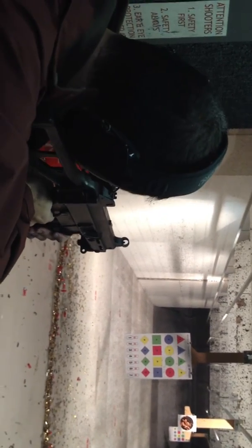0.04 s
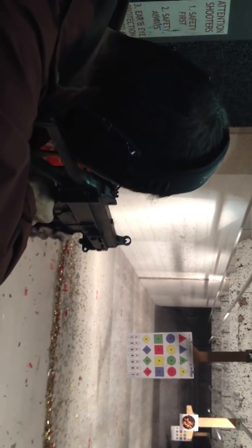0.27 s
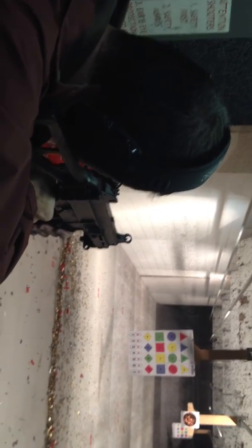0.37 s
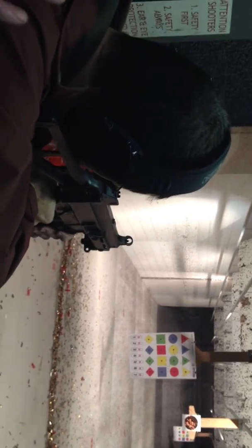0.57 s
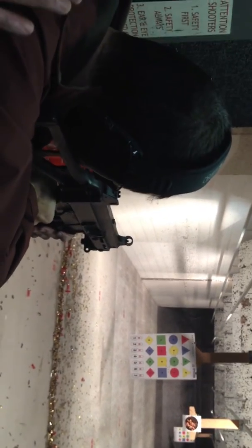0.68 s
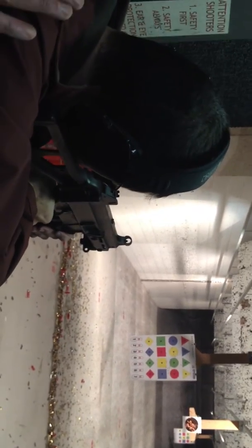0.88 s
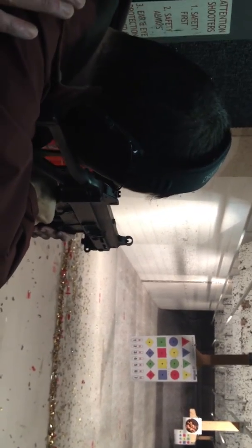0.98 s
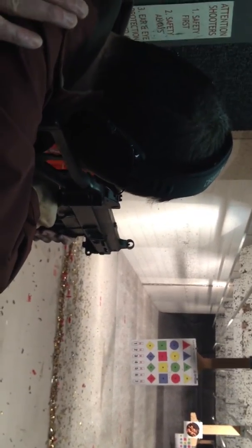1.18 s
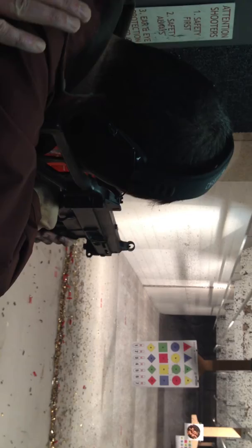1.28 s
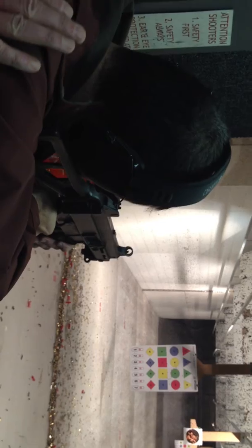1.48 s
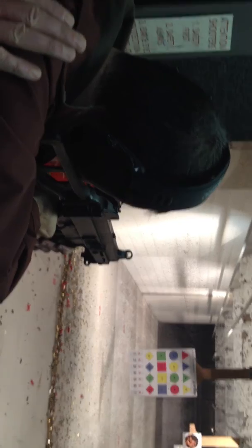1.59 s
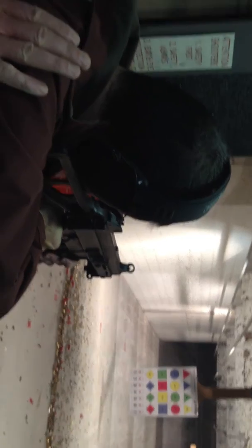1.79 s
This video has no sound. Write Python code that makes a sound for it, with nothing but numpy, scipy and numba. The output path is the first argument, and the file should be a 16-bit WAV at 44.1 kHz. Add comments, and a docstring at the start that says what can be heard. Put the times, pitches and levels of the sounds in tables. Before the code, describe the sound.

Two rapid submachine gun shots blast and echo in a concrete indoor range, then a casing clinks

```python
"""Two gunshots a tenth of a second apart: a submachine gun in a concrete indoor range, close to the microphone.
Each shot is a pressure pulse, a bright noise blast, wall echoes, a boom from down the lane and reverberation.
A spent case then clinks, as struck modes and short noise; ventilation is filtered noise with a duct drone.
The microphone overloads, and its gain control ducks the ventilation, which slowly comes back up."""
import sys
import numpy as np
from scipy import signal
from scipy.fft import rfft, irfft
from scipy.io import wavfile
from scipy.ndimage import uniform_filter1d
from numba import njit

SR = 44100
rng = np.random.default_rng(int(sys.argv[2]) if len(sys.argv) > 2 else 0)


def wav_record(signal):
    """Record a signal, one row per channel, as 16-bit PCM in the file named by sys.argv[1]."""
    frames = np.transpose(np.atleast_2d(signal))
    bounded = np.clip(frames, -1, 1)
    # unit amplitude maps onto the largest positive 16-bit level
    quanta = np.round(bounded * 32767).astype(np.int16)
    wavfile.write(sys.argv[1], SR, quanta)


N = 81585  # length in samples

# colour of echoes from hard walls: (f/Hz, relative spectral level/dB)
WALL_COLOUR = [(30, -46), (200, -13), (500, 3.5), (900, 0), (1400, -0.5), (2100, 0.5), (3000, -10),
               (7000, -18.5), (15500, -48)]


def gun():
    """Superposition: each round sums its direct sound, reflections and reverberation."""
    # rounds: (t/s, level/dB, treble lift of the blast/dB, blast delay/s, blast hold/s, wall echo level/dB)
    rounds = [(0.2341, 2.5, 1.5, 0.00267, 0.026, -3), (0.3361, -1.5, 1.5, 0.00034, 0.011, 4.5)]
    bench_delay_s, bench_db = 0.002504, 12  # bounce off the bench, relative to the direct pulse
    total = 0
    for start, level_db, treble_db, delay, hold, walls_db in rounds:
        shot = muzzle(start)
        shot = shot + undb(bench_db) * muzzle(start + bench_delay_s)
        shot = shot + blast(start + delay, treble_db, hold)
        shot = shot + undb(walls_db) * walls(start)
        shot = shot + boom(start) + hall(start)
        total = total + undb(level_db) * shot
    return total


def muzzle(start):
    """Blast wave: a steep pressure jump and a suction phase, band-limited by the shooter's body."""
    pulse_db, time_constant_s = 8.5, 0.00068
    low_hz, top_hz = 340, 2540
    age = since(start) / time_constant_s
    pressure = undb(pulse_db) * (age > 0) * (1 - age) * np.exp(-age)
    shade = signal.butter(2, [low_hz, top_hz], "band", fs=SR, output="sos")
    return signal.sosfilt(shade, pressure)


def blast(start, treble_db, hold):
    """Turbulent jet noise: a bright roar of gas, scattered by the booth walls and decaying exponentially."""
    # colour of the gas roar: (f/Hz, relative spectral level/dB)
    gas_colour = [(30, -30), (160, -5.5), (600, 4.5), (2000, 2), (3500, 1), (6700, -3), (9200, -9),
                  (13000, -8.5), (15500, -13)]
    level_db, attack_s, t60_s = 6, 0.0021, 0.19
    gas = noise(gas_colour)
    treble = highpass(gas, hz=3020)
    gas = gas + (undb(treble_db) - 1) * treble
    return undb(level_db) * gas * burst(start, attack_s, hold, t60_s)


def walls(start):
    """Early reflections: dense, duller echoes from the side walls and ceiling."""
    level_db, delay_s = 0.5, 0.011
    attack_s, hold_s, t60_s = 0.0045, 0.026, 0.13
    return undb(level_db) * noise(WALL_COLOUR) * burst(start + delay_s, attack_s, hold_s, t60_s)


def boom(start):
    """Room modes: the low part of the shot returns from the lane and rings standing waves."""
    # standing waves of the room: (f/Hz, relative level/dB, t60/s)
    room_modes = [(162, -13, 0.96), (192.6, 0, 1.16), (252, -5.5, 1.24), (304.3, -3, .85), (369, -3, 0.9),
                  (428, -14, 0.29), (584, -15, .6)]
    # colour of the returning sound: (f/Hz, relative spectral level/dB)
    boom_colour = [(30, -18), (80, -26), (140, -7.5), (220, -4), (380, 2.5), (600, -7), (1000, -17.5),
                   (1600, -11), (4000, -28), (15500, -40)]
    delay_s, attack_s, hold_s, t60_s = 0.053, 0.004, 0.02, 0.15
    boom_db, modes_db = 3, -13
    back = start + delay_s
    rumble = noise(boom_colour) * burst(back, attack_s, hold_s, t60_s)
    return undb(boom_db) * rumble + undb(modes_db) * ring(back, room_modes)


def hall(start):
    """Diffuse reverberation: octave bands decay at their own rates, treble first; the backstop slaps late."""
    # colour of the reverberation: (f/Hz, relative spectral level/dB)
    hall_colour = [(30, -58), (90, -22.5), (160, -7.5), (370, -1), (600, -5.5), (900, -6.5), (2000, -8),
                   (3500, -12), (6700, -17), (9500, -21), (15500, -24)]
    # decay of the reverberation: (f/Hz, t60/s)
    hall_decay = [(60, 1.0), (250, 1.265), (600, 0.89), (2000, 0.81), (5000, 0.62), (8000, 0.49),
                  (14000, 0.33)]
    level_db, build_s = 2, 0.022
    slap_delay_s, slap_db, slap_t60_s = 0.183, -15.5, 0.34
    spectrum = rfft(noise(hall_colour))
    octave = np.log2(np.maximum(np.fft.rfftfreq(N, 1 / SR), 1))
    age = since(start)
    tail = 0
    for centre in np.arange(4, 15):  # overlapping triangular bands centred on 2**centre Hz
        band = irfft(spectrum * np.maximum(1 - abs(octave - centre), 0), N)
        tail = tail + band * fade(age, along(hall_decay, 2. ** centre))
    tail = tail * np.minimum(age / build_s, 1)
    slap = undb(slap_db) * noise(WALL_COLOUR) * burst(start + slap_delay_s, 0.014, 0, slap_t60_s)
    return undb(level_db) * (tail + slap)


def spent_case():
    """Impact excitation: a brass case chatters on a hard surface, with ticks, modal ring and bright wash."""
    # contacts: (t/s, level/dB)
    contacts = [(1.1815, -13), (1.1850, -4), (1.1892, -3)]
    # modes of the case: (f/Hz, relative level/dB, t60/s)
    brass_modes = [(3800, -12, 0.06), (7354, -29.5, .12), (9000, -7, .075), (11070, -8, .07),
                   (13380, -14, .06)]
    # colour of ticks and wash: (f/Hz, relative spectral level/dB)
    scrape_colour = [(1500, -28), (3500, -8), (5000, -3), (7800, -3.5), (10000, -13), (13500, -11),
                     (15500, -14)]
    ring_db, tick_db, wash_db = -44, -33, -37
    tick_t60_s, wash_t60_s = 0.019, 0.18
    total = 0
    for start, level_db in contacts:
        tick = undb(tick_db) * burst(start, 0, 0, tick_t60_s)
        wash = undb(wash_db) * burst(start, 0.00071, 0, wash_t60_s)
        clink = undb(ring_db) * ring(start, brass_modes)
        total = total + undb(level_db) * (clink + noise(scrape_colour) * (tick + wash))
    return total


def ventilation():
    """Flow noise and duct resonance: a steady rush over a swelling drone, both wavering a little."""
    # colour of the rush: (f/Hz, relative spectral level/dB)
    rush_colour = [(30, -41), (85, -21), (125, -9.5), (175, -5.5), (270, -7), (400, -9), (520, -14.5),
                   (630, -10.5), (800, -15), (1250, -13), (2400, -17.5), (4500, -26.5), (7000, -31.5),
                   (9500, -41.5), (13300, -41.5), (15500, -56)]
    # duct resonances: (f/Hz, offset at which the peak is 6 dB down/Hz, relative level/dB)
    duct_peaks = [(164.5, 7.4, -0.5), (185.6, 19, 0.5), (244, 12, 2), (274, 25, -3.5), (325, 12.7, -0.5)]
    # swelling and sinking of the drone: (t/s, level/dB)
    drone_level = [(0, -39), (0.9, -40.5), (1.25, -43.5), (1.38, -35), (1.85, -38.5)]
    rush_db = -35
    waver_db, waver_hz = 0.14, 14  # spread of the random level targets, and their rate
    step = int(SR / waver_hz)
    targets = rng.standard_normal(N // step + 1)
    waver = uniform_filter1d(np.repeat(targets, step), step)[:N]
    freqs = np.fft.rfftfreq(N, 1 / SR)
    response = sum(undb(db) / (1 + ((freqs - hz) / width) ** 4) for hz, width, db in duct_peaks)
    drone = irfft(rfft(rng.standard_normal(N)) * response, N)
    drone = drone / np.std(drone)
    drone_db = np.interp(np.arange(N) / SR, *np.array(drone_level).T)
    air = undb(rush_db) * noise(rush_colour) + undb(drone_db) * drone
    return air * undb(waver_db * waver)


def undb(db):
    """Logarithmic level: decibels to amplitude gain."""
    return 10 ** (np.asarray(db) / 20)


def along(table, hz):
    """Logarithmic pitch axis: interpolate a (f/Hz, value) table over log frequency."""
    f, v = np.array(table, float).T
    return np.interp(np.log(np.maximum(hz, 1)), np.log(f), v)


def noise(colour):
    """Spectral shaping: white noise weighted by a colour table, scaled to rms 1."""
    gain = undb(along(colour, np.fft.rfftfreq(N, 1 / SR)))
    x = irfft(rfft(rng.standard_normal(N)) * gain, N)
    return x / np.std(x)


def since(start):
    """Causality: seconds since a moment, zero before it."""
    return np.maximum(np.arange(N) / SR - start, 0)


def fade(age, t60):
    """Exponential energy loss: the level falls 60 dB in t60 seconds."""
    return np.exp(-np.log(1000) * age / t60)


def burst(start, attack, hold, t60):
    """Amplitude envelope: linear attack, hold, exponential decay."""
    age = since(start)
    rise = np.minimum(age / max(attack, 1 / SR), 1)
    return rise * fade(np.maximum(age - attack - hold, 0), t60)


def ring(start, modes):
    """Modal superposition: damped sinusoids start together in random phases."""
    age = since(start)
    total = 0
    for hz, db, t60 in modes:
        wave = np.sin(2 * np.pi * hz * age + rng.uniform(0, 2 * np.pi))
        total = total + undb(db) * wave * fade(age, t60)
    return total * (age > 0)


def highpass(x, hz, order=1):
    """Maximally flat filtering: attenuate what lies below the cutoff."""
    return signal.sosfilt(signal.butter(order, hz, "high", fs=SR, output="sos"), x)


@njit
def gain_control(over_db, attack, recover):
    """Feed-forward control: the cut in dB approaches the excess exponentially and recovers linearly."""
    out, cut = np.empty(len(over_db)), 0.
    for i in range(len(over_db)):
        if over_db[i] > cut:
            cut += (over_db[i] - cut) * attack
        else:
            cut = max(cut - recover, 0.)
        out[i] = cut
    return out


def held_down(x, top_db, attack_s, recover_db_per_s):
    """Dynamic compression: excess over a threshold level lowers the gain."""
    over_db = 20 * np.log10(abs(x) + 1e-9) - top_db
    attack = min(1 / (attack_s * SR), 1.)
    return x * undb(-gain_control(over_db, attack, recover_db_per_s / SR))


def scene():
    """Linear superposition of the sounds arriving at the microphone."""
    return (gun() + spent_case() + ventilation())[None]


def record(dry):
    """Nonlinear transduction: overload, slow and fast gain reduction, rounded peaks, and a band limit."""
    overload = undb(12)
    ceiling = 0.61  # amplitude approached by the rounded peaks
    x = overload * np.tanh(dry[0] / overload)
    x = highpass(x, hz=61, order=2)
    x = held_down(x, top_db=-2, attack_s=0.0068, recover_db_per_s=6.5)  # slow gain control
    x = held_down(x, top_db=-4.5, attack_s=0.00013, recover_db_per_s=259)  # fast limiter
    x = x / (1 + (x / ceiling) ** 8) ** (1 / 8)
    top_cut = signal.ellip(10, .2, 80, 15300, fs=SR, output="sos")  # steep low-pass at 15300 Hz
    return signal.sosfilt(top_cut, x)[None]


dry = scene()
out = record(dry)
wav_record(out)
```